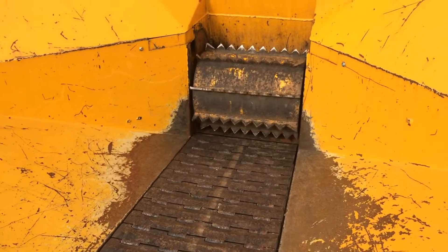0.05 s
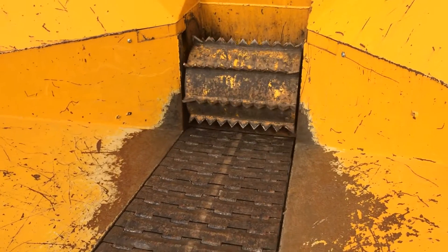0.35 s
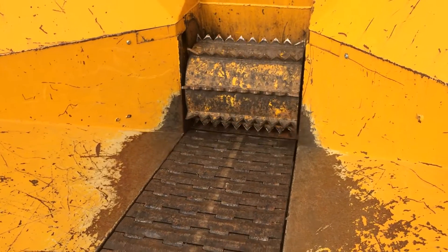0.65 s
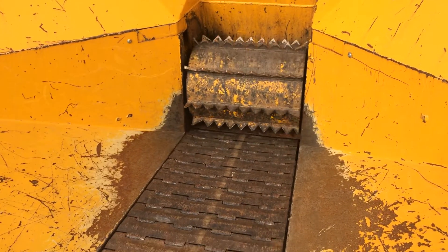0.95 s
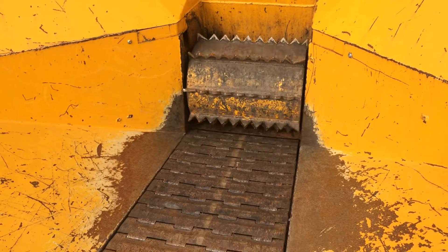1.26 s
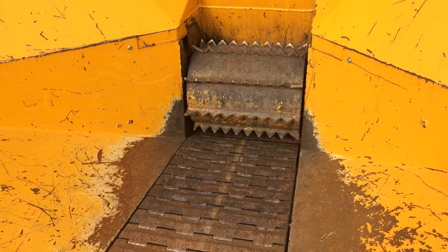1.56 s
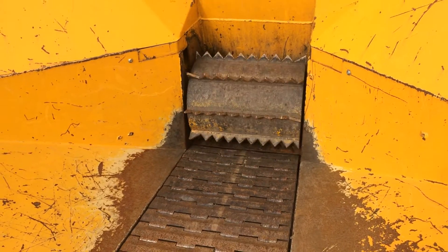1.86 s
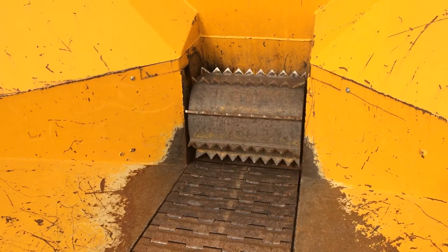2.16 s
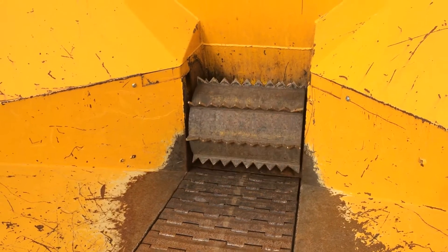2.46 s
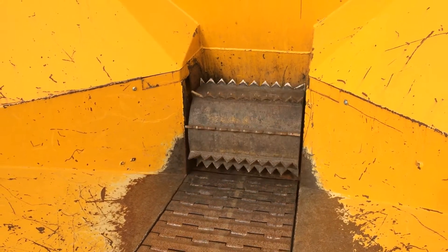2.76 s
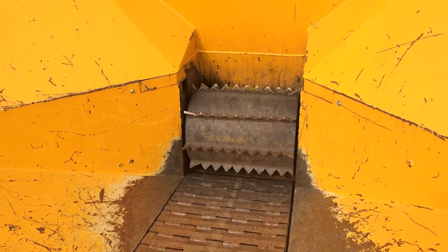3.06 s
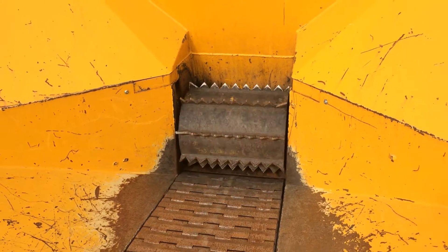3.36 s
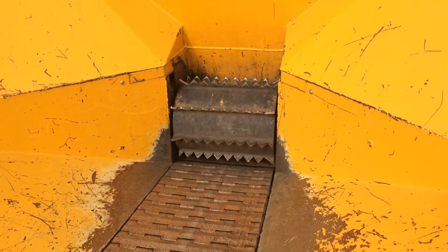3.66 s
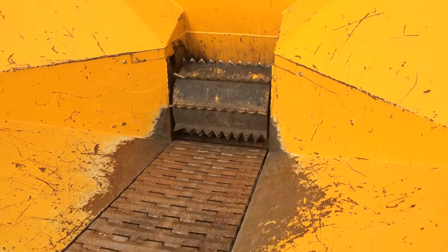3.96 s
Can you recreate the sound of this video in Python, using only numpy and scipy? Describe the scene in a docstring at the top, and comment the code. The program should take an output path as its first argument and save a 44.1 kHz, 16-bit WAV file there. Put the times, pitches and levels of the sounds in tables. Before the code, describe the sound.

Steady drone of an empty wood chipper, with engine throb, rumbling air and faint chain rattle.

```python
"""A wood chipper runs empty at a steady speed, heard from the mouth of its steel infeed hopper.
From the start the cutting rotor drones and chops the air it fans, the engine throbs against it,
air rumbles and hisses, and the feed chain rattles faintly. A limiter turns down each loud peak,
so the hiss flutters with the beats. From about 0.7 s the feed roller rasps softly now and then.
Near the end the hopper's hollow ring grows fuller as the listener draws back."""
import sys
import numpy as np
from scipy import signal
from scipy.fft import rfft, irfft
from scipy.io import wavfile
from scipy.ndimage import uniform_filter1d, minimum_filter1d

SR = 44100
rng = np.random.default_rng(int(sys.argv[2]) if len(sys.argv) > 2 else 0)


def dump_mix(stems):
    """Bounce the given channels to the path in sys.argv[1] as a 16-bit WAV at rate SR."""
    frames = np.atleast_2d(stems).T  # one column per channel
    limited = np.clip(frames, -1, 1)  # hard clip at full scale
    pcm = np.round(limited * 32767).astype(np.int16)
    wavfile.write(sys.argv[1], SR, pcm)


N = 176400
T = np.arange(N) / SR

# Tones in the rotor's drone: (multiple of the blade rate, relative level [dB])
ROTOR_TONES = [(1, -26), (2, -23.5), (3, -14), (4, -16), (5, -32.5), (6, -31.5), (7, -41.5), (8, -24.5),
               (9, -29), (10, -28.5), (11, -37.5), (12, -37.5), (13, -42), (14, -38), (15, -44), (16, -61),
               (17, -52), (18, -42.5), (19, -82), (20, -44.5), (21, -53), (24, -45.5), (26, -53.5),
               (31, -58.5), (34, -51), (36, -54.5), (40, -63)]
# Air bursts in each blade pass: (place in the pass [0-1], relative power)
AIR_BURSTS = [(.02, 0.46), (.31, 1.0), (.52, 0.59), (.68, 0.4)]
# Tone colour of the chopped air: (frequency [Hz], relative level [dB])
AIR_COLOUR = [(400, 5), (700, -6.5), (1050, 1), (1280, -7.5), (1600, -4.5), (2000, -8.5), (2400, -11),
              (3000, -30.5), (6000, -34)]
# Swells and dips of the chopped air: (time [s], level change [dB])
AIR_SWELLS = [(0, -1), (1.08, .3), (1.17, -8), (1.27, 2.5), (1.4, -2.5), (1.92, -1.5), (2.03, 3), (2.1, -2),
              (2.6, -2.5), (2.95, -2.5), (3.33, -3), (3.5, 0.5), (3.62, -1.5), (4, -2)]
# Tones in the engine's throb: (multiple of the cycle rate, relative level [dB])
ENGINE_TONES = [(1, -65), (2, -43.5), (3, -33), (4, -23), (5, -37), (6, -27), (7, -48), (8, -27),
                (9, -27.5), (10, -57), (11, -65), (12, -33.5), (13, -49.5), (17, -66), (18, -69), (19, -57),
                (23, -55), (24, -43)]
# Tone colour of the rumble: (frequency [Hz], relative level [dB])
RUMBLE_COLOUR = [(24, -15), (38, -11), (70, -3.5), (120, -1.5), (190, 1), (250, -4.5), (330, -14.5),
                 (430, -16), (540, -10.5), (700, -17.5), (1000, -21.5)]
# Tone colour of the hiss: (frequency [Hz], relative level [dB])
HISS_COLOUR = [(600, 12.5), (1500, 2), (2400, 3), (3000, 2), (4300, -0.5), (5200, -4.5), (7500, -7),
               (10000, -12.5), (13000, -18.5), (15500, -21)]
# Swells and dips of the hiss: (time [s], level change [dB])
HISS_SWELLS = [(0, 1.5), (.3, -.5), (.7, 0), (.9, -.5), (1.6, -.5), (2.1, 0), (2.6, -1), (2.87, 0.5),
               (3.15, -1), (3.45, 0.5), (3.8, 0.8), (4, 1.5)]
# Clearer ticks of the feed chain: (time [s], relative level [dB])
CHAIN_TICKS = [(.114, -36), (.737, -37), (.826, -33), (2.856, -34), (3.281, -37)]
# Strength of the hopper's hollow ring: (time [s], boost [dB])
RING_BOOST = [(0, 3), (.6, 2), (1.6, 0.2), (2.7, 0), (3.3, 0), (3.7, 5), (4, 7)]
# Rasps of the feed roller: (time [s], level [dB])
ROLLER_RASPS = [(.66, -38), (.748, -32), (1.325, -35), (1.715, -39), (2.03, -47), (2.35, -36), (2.46, -34),
                (2.875, -34), (2.985, -34), (3.40, -38), (3.49, -34)]
# Tone colour of a rasp: (frequency [Hz], relative level [dB])
RASP_COLOUR = [(900, -21), (2000, 9), (3000, -5), (4500, -8.5), (7500, -9.5), (11000, -21), (15000, -26)]


def from_db(db):
    """Turn decibels into a number to multiply a sound by."""
    return 10 ** (np.asarray(db) / 20)


def rms_one(x):
    """Scale a signal so that its average strength (rms) is 1."""
    return x / np.sqrt(np.mean(x ** 2) + 1e-20)


def along(rows, at):
    """Read a table, joining its rows by straight lines."""
    return np.interp(at, *np.transpose(rows))


def drift(rate_hz):
    """A smooth random wobble, about 1 in size."""
    step, warm_up = 40, 2000
    r = np.exp(-2 * np.pi * step * rate_hz / SR)
    slow = signal.lfilter([1], [1, -2 * r, r * r], rng.standard_normal(N // step + warm_up + 2))[warm_up:]
    return np.interp(np.arange(N) / step, np.arange(len(slow)), rms_one(slow))


def noise(spectrum):
    """Noise with the given tone colour, at strength 1."""
    hz, db = np.transpose(spectrum)
    bins = np.maximum(np.arange(N // 2 + 1) * SR / N, 1)
    colour = from_db(np.interp(np.log(bins), np.log(hz), db))
    edge_fade = np.minimum(bins / hz[0], 1) ** 2 * np.minimum(hz[-1] / bins, 1) ** 2
    return rms_one(irfft(rfft(rng.standard_normal(N)) * colour * edge_fade, N))


def pulses(cycles, tones, smear, clear_tones=7):
    """One pressure pulse per cycle, built from tones; smear makes each trail the one below."""
    k = np.arange(1, round(tones[-1][0]) + 1)
    gains = from_db(along(tones, k))
    # Echoes in the hopper scramble the timing of the higher tones.
    lags = np.pi * smear * k * k + (k > clear_tones) * rng.uniform(0, 2 * np.pi, len(k))
    return np.sqrt(2) * sum(g * np.cos(2 * np.pi * n * cycles - lag) for n, g, lag in zip(k, gains, lags))


def rotor(blade_hz=64.14, start_s=.0125, wander_s=.00003):
    """Each passing blade makes a pressure pulse and a few bursts of rushing air."""
    passes = blade_hz * (T - start_s + wander_s * drift(4.9))
    drone = from_db(.5) * pulses(passes, ROTOR_TONES, smear=.82)
    air_power, burst_width = .5, .024  # power between bursts; share of a pass
    for place, power in AIR_BURSTS:
        offset = (passes - place + .5) % 1 - .5
        air_power += power * np.exp(-.5 * (offset / burst_width) ** 2)
    air = rms_one(noise(AIR_COLOUR) * np.sqrt(air_power))
    return drone + air * from_db(-30 + along(AIR_SWELLS, T))


def engine(cycle_hz=22.45, start_s=.00872, wander_s=.00006):
    """A four-stroke engine fires; its tones lie close to the rotor's, so the two throb together."""
    cycles = cycle_hz * (T - start_s + wander_s * drift(4.9))
    return from_db(1.5) * pulses(cycles, ENGINE_TONES, smear=.256)


def airflow(rumble_db=-19.5, hiss_db=-33.5, flicker_db=1.0):
    """Swirling air rumbles in the hopper and hisses through the housing."""
    hiss_gain = from_db(hiss_db + along(HISS_SWELLS, T) + flicker_db * drift(12))
    return from_db(rumble_db) * noise(RUMBLE_COLOUR) + hiss_gain * noise(HISS_COLOUR)


def feed_chain(hits_per_s=600, band_hz=(2970, 12500), pitches=18, ring_cycles=12, tick_decay_s=.009):
    """Steel slats knock at random and ring briefly, with a few clearer ticks."""
    sizes = from_db(-.5 * np.minimum(rng.exponential(1, N), 4)) * rng.choice([-1, 1], N)
    hits = sizes * (rng.random(N) < hits_per_s / SR)
    pitch_of_hit = rng.integers(0, pitches, N)
    rattle = np.zeros(N)
    for k, hz in enumerate(np.geomspace(*band_hz, pitches)):
        r = np.exp(-np.log(1000) * hz / (ring_cycles * SR))  # fades 60 dB in ring_cycles
        angle = 2 * np.pi * hz / SR
        knocks = hits * (pitch_of_hit == k) + 1e-18
        rattle += signal.lfilter([0, np.sin(angle)], [1, -2 * r * np.cos(angle), r * r], knocks)
    strikes = sum(from_db(db) * (T >= s) * np.exp(-abs(T - s) / tick_decay_s) for s, db in CHAIN_TICKS)
    band = signal.butter(1, band_hz, "band", fs=SR, output="sos")
    ticks = signal.sosfilt(band, strikes * rng.standard_normal(N))
    return from_db(-47) * rms_one(rattle) + ticks


def hopper(sound, ring_hz=(308, 400)):
    """The hopper adds a hollow ring that changes with where the listener stands."""
    ring = signal.sosfiltfilt(signal.butter(2, ring_hz, "band", fs=SR, output="sos"), sound)
    return sound + ring * (from_db(along(RING_BOOST, T)) - 1)


def feed_roller(width_s=.013):
    """The toothed roller rasps in short, soft swells of rubbing steel."""
    swells = sum(from_db(db) * np.exp(-.5 * ((T - s) / width_s) ** 2) for s, db in ROLLER_RASPS)
    return swells * noise(RASP_COLOUR)


def scene():
    """The whole machine, heard through the hopper in one channel."""
    return hopper(rotor() + engine() + airflow() + feed_chain() + feed_roller())[None]


def record(dry, limit_db=-3.5, release_db_per_s=135, lookahead_s=.0011, cutoff_hz=15400):
    """A limiter turns the sound down just ahead of each peak; then the highest treble is cut."""
    over_db = np.maximum(20 * np.log10(abs(dry[0]) + 1e-9) - limit_db, 0)
    recovery_db = release_db_per_s * T
    cut_db = np.maximum.accumulate(over_db + recovery_db) - recovery_db
    width = 2 * int(lookahead_s * SR / 2) + 1
    gain_db = uniform_filter1d(minimum_filter1d(-cut_db, width), width)
    treble_cut = signal.ellip(12, .1, 80, cutoff_hz, fs=SR, output="sos")
    return signal.sosfilt(treble_cut, dry * from_db(gain_db))


dry = scene()
out = record(dry)
dump_mix(out)
```